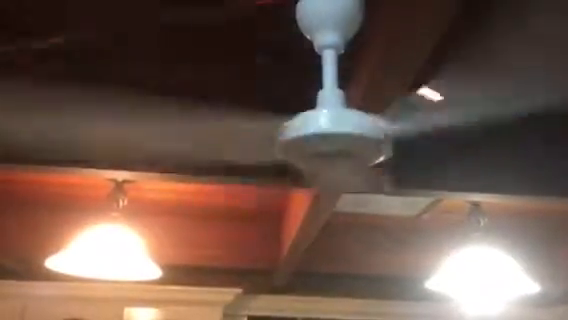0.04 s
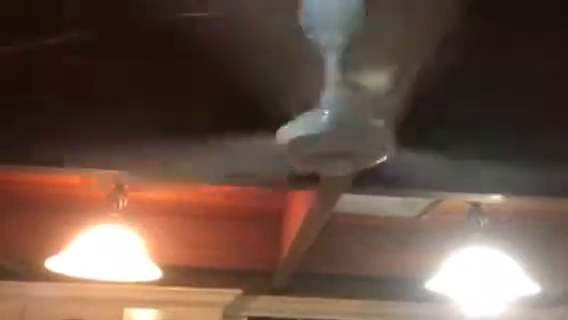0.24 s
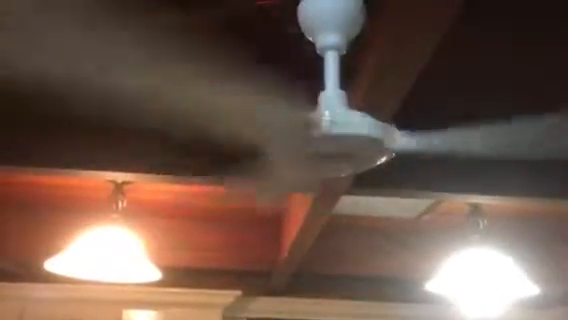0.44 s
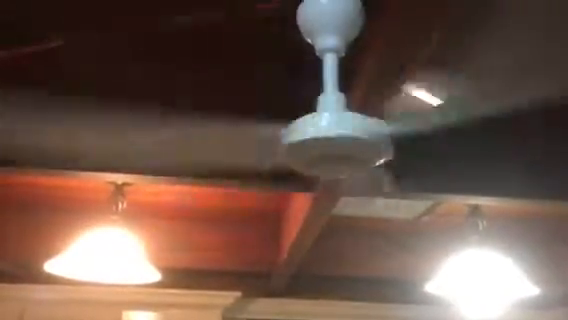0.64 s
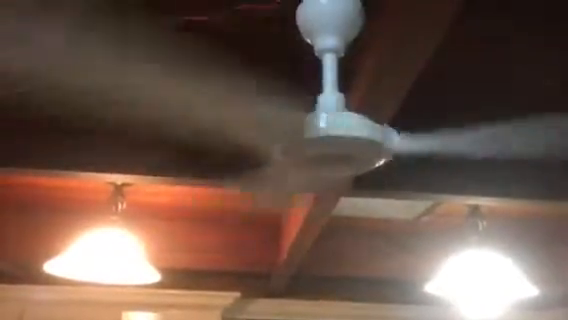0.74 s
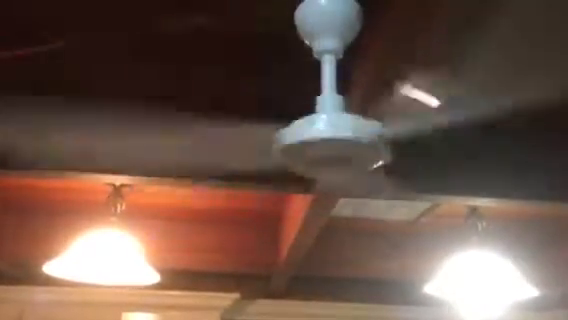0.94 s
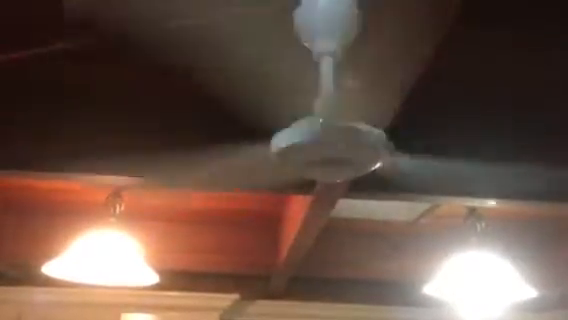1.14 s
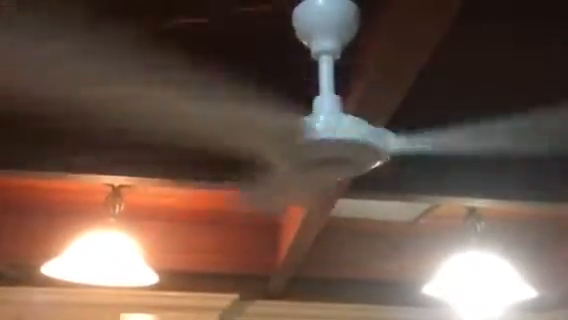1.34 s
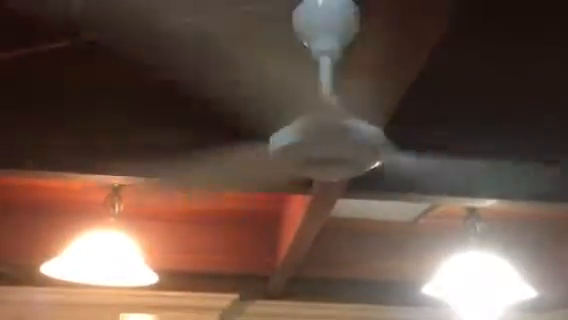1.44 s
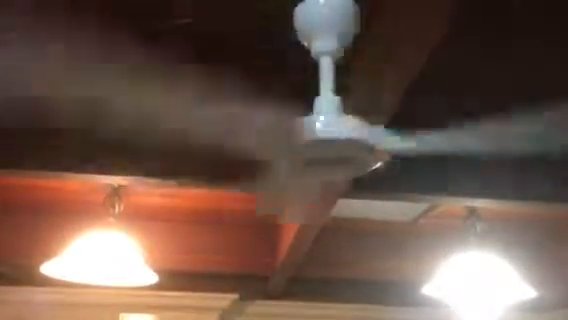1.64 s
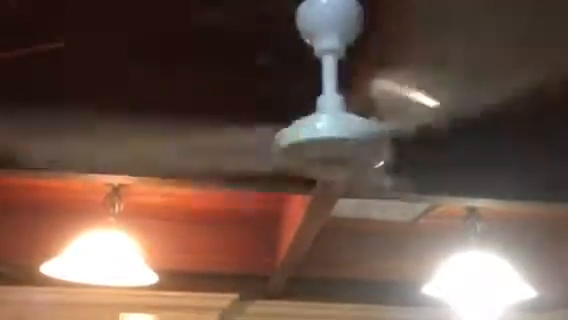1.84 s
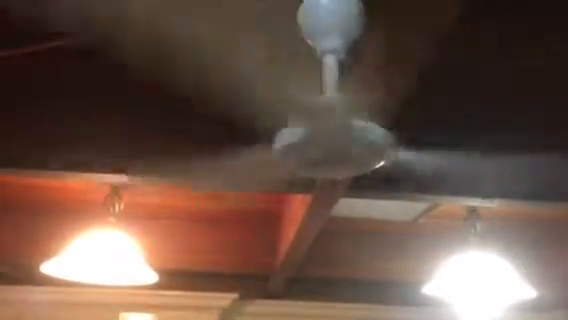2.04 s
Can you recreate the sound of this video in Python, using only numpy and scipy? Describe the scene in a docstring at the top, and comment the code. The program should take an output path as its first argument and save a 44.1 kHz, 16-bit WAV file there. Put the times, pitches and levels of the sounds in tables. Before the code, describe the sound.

A ceiling fan whirrs steadily with a fast, light motor chatter and a low hum.

```python
"""A ceiling fan runs steadily in a quiet room. Its motor chugs nine times a turn, and each chug
shakes a rasp and a thin ring out of the housing. The rotor whirrs and rubs lightly as it goes round.
Under this lie the motor's hum, a low rumble of moving air, soft low thuds and a steady hiss.
A camera close by ticks faintly at its frame rate and is softly bumped once, with a quick double knock."""
import sys
import numpy as np
from scipy import signal
from scipy.fft import rfft, irfft
from scipy.io import wavfile
from scipy.ndimage import uniform_filter1d

SR = 44100
rng = np.random.default_rng(int(sys.argv[2]) if len(sys.argv) > 2 else 0)


def output_pcm(signal):
    """Save a mono or channel-first signal as 16-bit PCM at the path in sys.argv[1].

    Samples are clipped to [-1, 1] before scaling.
    """
    pcm = np.clip(np.atleast_2d(signal).T, -1, 1) * 32767
    wavfile.write(sys.argv[1], SR, np.round(pcm).astype(np.int16))


N = 92610
TURN_HZ, CHUGS_PER_TURN, FIRST_CHUG_S = 4.422, 9, .0126


def amp(db):
    """Turns decibels into a number to multiply a sound by."""
    return 10 ** (np.asarray(db) / 20)


def unit(x):
    """Scales a sound so that its average level (rms) is 1."""
    return x / np.sqrt(np.mean(x ** 2) + 1e-20)


def bell(since, half_s):
    """A smooth rise and fall that peaks when since is 0."""
    return np.exp(-.5 * (since / half_s) ** 2)


def colour(x, points):
    """Shapes the lows and highs of a sound with rows of Hz and dB, at average level 1."""
    hz, db = np.transpose(points)
    gains = amp(np.interp(np.log(np.fft.rfftfreq(N, 1 / SR) + 1), np.log(hz), db))
    return unit(irfft(rfft(x) * gains, N))


def band(hz, width_hz):
    """Noise around one pitch; around 0 Hz it is a slow random wobble."""
    freqs = np.fft.rfftfreq(N, 1 / SR)
    return unit(irfft(rfft(rng.standard_normal(N)) * np.exp(-((freqs - hz) / width_hz) ** 2), N))


def evened(x, span_s):
    """Holds the level of a noise steady from one short span to the next."""
    power = uniform_filter1d(x ** 2, max(round(span_s * SR), 3))
    return unit(x / np.sqrt(abs(power) + 1e-20))


def nearest_chug(t, delay_s):
    """The number of the nearest chug, and the seconds since it (negative before it)."""
    rate = TURN_HZ * CHUGS_PER_TURN
    elapsed = t - FIRST_CHUG_S - delay_s
    number = np.round(elapsed * rate).astype(int)
    return number, elapsed - number / rate


# The tone of the hiss. Each row: frequency in Hz, relative level in dB.
HISS_SPECTRUM = [(100, 8.5), (450, -2.5), (1000, -1), (1600, -5.5), (2300, -1), (2600, -6), (3300, -4),
                 (4800, -13), (5400, -13.5), (6300, -15.5), (7400, -17), (9100, -15), (10500, -23.5),
                 (12000, -27), (13700, -26), (16000, -43)]

def hiss():
    """The steady hiss of the room and the microphone."""
    return amp(-62) * colour(rng.standard_normal(N), HISS_SPECTRUM)


# The tone of the moving air. Each row: frequency in Hz, relative level in dB.
RUMBLE_SPECTRUM = [(10, -28), (28, -2), (45, 4), (68, -2), (95, -5.5), (140, -5.5), (220, -11),
                   (300, -14.5), (420, -22.5), (900, -77)]
# How the rumble rises and falls. Each row: time in seconds, level in dB.
RUMBLE_LEVELS = [(0, -58.5), (.15, -55.5), (.3, -56.5), (.45, -58), (.56, -55), (.85, -55.5), (.98, -57),
                 (1.15, -55.5), (1.45, -55.5), (1.56, -54), (1.63, -59), (1.71, -56.5), (1.8, -59.5),
                 (2.1, -54)]

def air_rumble(t):
    """The draught from the fan makes a low rumble."""
    noise = evened(colour(rng.standard_normal(N), RUMBLE_SPECTRUM), span_s=.06)
    return amp(np.interp(t, *np.transpose(RUMBLE_LEVELS))) * noise


# Soft low thuds. Each row: middle in seconds, peak level in dB, half length in seconds, pitch in Hz.
THUDS = [(.102, -46, .007, 64), (.141, -47.5, .011, 66), (.201, -47, .006, 55), (.577, -48, .02, 82),
         (.666, -45.5, .01, 62), (.717, -43, .007, 68), (.733, -46, .012, 62), (.89, -44.5, .008, 66),
         (1.076, -45, .013, 57), (1.243, -44.5, .009, 66), (1.333, -43.5, .008, 54), (1.397, -48, .014, 72),
         (1.456, -44.5, .015, 66), (1.509, -47, .013, 68), (1.546, -46, .012, 70), (1.583, -43.5, .01, 74),
         (1.695, -43, .008, 80), (1.722, -47, .011, 76), (1.821, -43, .01, 60), (1.91, -46, .009, 70),
         (1.983, -47, .007, 80), (2.084, -46, .009, 78)]

def low_thuds(t):
    """Puffs of air on the microphone, plus the low body of the first light camera knock at 0.2 s."""
    out = np.zeros(N)
    for at, db, half_s, hz in THUDS:
        out -= amp(db) * bell(t - at, half_s) * np.cos(2 * np.pi * hz * (t - at))
    return out


# The tone of a tick. Each row: frequency in Hz, relative level in dB.
TICK_SPECTRUM = [(500, -30), (3000, -9), (4600, -15), (5500, -8), (6400, -10), (7500, -2), (9000, -1),
                 (10300, -12), (11700, -20), (13400, -13.5), (16000, -19)]

def camera_ticks(t, frame_hz=30, ring_hz=9370, ring_decay_s=.0014):
    """The camera ticks twice a frame, the second tick often late, each with a tiny high ring."""
    frames = np.arange(0, N / SR, 1 / frame_hz)
    late_s = .009 * np.maximum(rng.uniform(-1, 1, len(frames)), 0)
    times = np.r_[frames + .0057, frames + .0225 + late_s]
    sizes = amp(.4 * rng.standard_normal(len(times)))
    clicks = np.bincount((times * SR).astype(int), sizes, N)[:N]  # one spike for each tick
    ping = np.exp(-t / ring_decay_s) * np.sin(2 * np.pi * ring_hz * t)
    ringing = unit(signal.fftconvolve(clicks, ping)[:N])
    return amp(-74) * colour(clicks, TICK_SPECTRUM) + amp(-84.5) * ringing


# The two knocks of the bump, light then stronger. Each row: start in seconds, peak level in dB.
KNOCKS = [(0.2018, -38), (.235, -23)]

def camera_knock(t, start, db, high_hz=243, low_hz=53.3, sag_s=.0093, rise_s=.0064, decay_s=.017):
    """A dull, dry knock on the camera body whose pitch sinks as it dies away."""
    age = np.maximum(t - start, 0)
    hz = low_hz + (high_hz - low_hz) * np.exp(-(age / sag_s) ** 2)
    note = np.sin(2 * np.pi * np.cumsum(hz * (age > 0)) / SR)
    rise = np.sin(np.pi / 2 * np.minimum(age / rise_s, 1))
    decay = np.exp(-np.maximum(age - rise_s, 0) / decay_s)
    damping = np.exp(-(age / .034) ** 4)  # cuts the tail short
    return -amp(db) * rise * decay * damping * note


# The motor's steady tones. Each row: pitch in Hz, level in dB.
HUM_TONES = [(78.8, -61), (119.8, -66), (317.6, -74), (519.5, -70.5), (560.7, -75.5), (633, -77),
             (671, -73.5), (710.5, -70.5), (760, -68), (813.4, -69.5)]

def motor_hum(t, throb_hz=206.2, throb_depth=.73, throb_at_s=.1513):
    """The motor hums with wavering tones, plus one that throbs once a turn."""
    def tone(hz):
        return np.sin(2 * np.pi * (hz * t + rng.random()) + .85 * band(0, width_hz=8))

    steady = sum(amp(db) * unit(tone(hz)) for hz, db in HUM_TONES)
    swell = 1 + throb_depth * np.cos(2 * np.pi * TURN_HZ * (t - throb_at_s))
    return steady + amp(-63.5) * unit(swell * tone(throb_hz))


# The tone of the whirr. Each row: frequency in Hz, relative level in dB.
WHIRR_SPECTRUM = [(300, -77), (440, -13.5), (520, -3.5), (600, -5), (700, -0.5), (840, -1.5), (930, -3.5),
                  (1080, -5.5), (1210, -4), (1340, -4), (1520, -16.5), (1750, -17.5), (2200, -25),
                  (2550, -37), (3300, -46), (5000, -35)]

def rotor_whirr(t, repeat_share=.91, drift_s=.0001):
    """The rotor's running noise is mostly the same on every turn, drifting a little with its speed."""
    repeating = np.resize(rng.standard_normal(round(SR / TURN_HZ)), N)
    mixed = np.sqrt(repeat_share) * repeating + np.sqrt(1 - repeat_share) * rng.standard_normal(N)
    noise = evened(colour(mixed, WHIRR_SPECTRUM), span_s=.014)
    drifting_time = t + drift_s * band(0, TURN_HZ)
    return amp(-60) * np.interp(drifting_time, t, noise)


# Spots where the rotor rubs. Each row: first time in seconds, half length in seconds,
# pitch in Hz, width of the noise band in Hz, level at the loudest moment in dB.
RUB_SPOTS = [(0.0195, 0.0015, 1252, 98, -57.5), (0.0456, 0.0016, 1240, 100, -55),
             (0.1284, 0.001, 3800, 600, -61), (0.1424, 0.0016, 3080, 500, -67.5),
             (.208, 0.00087, 3420, 350, -60)]

def rotor_rubs(t):
    """The rotor rubs briefly at the same spots on every turn."""
    out = np.zeros(N)
    for at, half_s, hz, width_hz, db in RUB_SPOTS:
        since = (((t - at) * TURN_HZ + .5) % 1 - .5) / TURN_HZ  # seconds from the nearest pass
        out += amp(db) * bell(since, half_s) * evened(band(hz, width_hz), span_s=.003)
    return out


# How the ring slowly swells and fades. Each row: time in seconds, relative level in dB.
RING_LEVELS = [(.04, 2.5), (.14, -4), (.25, 2.5), (.4, -1.5), (.52, 1), (.6, -2), (.74, 2), (.82, -2),
               (.88, 1), (.95, -3), (1.04, -3), (1.13, 3.5), (1.2, -2), (1.36, 1), (1.56, -3), (1.68, 3),
               (1.8, 1), (1.95, -3), (2.1, -1)]

def metal_ring(t, hz=1950, slip_radians=1.3, sharpness=1.8):
    """A thin metal note is rubbed up afresh after every chug."""
    number, since = nearest_chug(t, delay_s=.0066)
    note = np.sin(2 * np.pi * hz * t + slip_radians * rng.standard_normal(128)[number])
    ring_db = np.array(CHUG_PATTERN)[number % CHUGS_PER_TURN, 3]
    swell_db = np.interp(t, *np.transpose(RING_LEVELS))
    pulse = abs(np.cos(np.pi * since * TURN_HZ * CHUGS_PER_TURN)) ** sharpness
    return amp(-67.3) * unit(amp(ring_db + swell_db) * pulse * note)


# What each chug shakes in the housing. Each row: delay in seconds (negative is early),
# half length in seconds, pitch in Hz, width of the noise band in Hz, average level in dB.
RASPS = [(0.00039, 0.00041, 1120, 52, -79.5), (-0.00022, 0.0019, 2300, 370, -76),
         (-0.00062, 0.0025, 783, 160, -66.5), (-0.00057, 0.0017, 3240, 770, -72.5),
         (-0.00095, 0.004, 3990, 92, -78), (0.0053, 0.0022, 3390, 540, -78),
         (0.0065, 0.0035, 1980, 330, -75.5), (-0.0018, 0.002, 5350, 400, -80.5),
         (.0059, 0.0012, 5200, 1850, -79), (.0058, 0.00079, 9000, 1500, -79.5)]

def housing_rasps(t):
    """Each chug sets off brief rasps, as strong as its place in the turn makes them."""
    out = np.zeros(N)
    for delay_s, half_s, hz, width_hz, db in RASPS:
        number, since = nearest_chug(t, delay_s)
        rasp_db = np.array(CHUG_PATTERN)[number % CHUGS_PER_TURN, 2]
        noise = evened(band(hz, width_hz), span_s=.003)
        out += amp(db) * unit(amp(rasp_db) * bell(since, half_s) * noise)
    return out


# The nine chugs of one turn. Each row: level in dB, pitch in Hz, rasp level in dB, ring level in dB.
# These levels only say how the chugs compare with each other.
CHUG_PATTERN = [(-6.5, 1085, 1, 2), (0, 1085, 2.5, 0), (.7, 1070, 1.5, 1), (-3.2, 1100, 0, 1.5),
                (-3.8, 1105, -2, -2.5), (-3.3, 1100, -2, -3), (-3.2, 1125, -2.5, -2.5),
                (-1.5, 1125, -1.5, 1), (-2.3, 1130, 1, 1)]

def motor_chugs(t, rise_s=.00078, fall_s=.0028, scatter_db=1, jitter_s=.00013):
    """Each chug is a short burst of the housing's main note, in a pattern that repeats every turn."""
    number, since = nearest_chug(t, delay_s=-.00061)
    place = number % CHUGS_PER_TURN
    db, hz = np.array(CHUG_PATTERN)[place, :2].T
    size = amp(db - scatter_db * rng.standard_normal(128)[number])
    jitter = jitter_s * rng.standard_normal(128)[number]
    burst = bell(since, np.where(since < 0, rise_s, fall_s))
    note = np.cos(2 * np.pi * (hz * (since + jitter) + place / CHUGS_PER_TURN))
    return amp(-60) * unit(size * burst * note)


def scene():
    """Adds the fan, the background and the camera noises into one channel."""
    t = np.arange(N) / SR
    fan = motor_chugs(t) + housing_rasps(t) + rotor_rubs(t) + metal_ring(t)
    fan += motor_hum(t) + rotor_whirr(t)
    background = air_rumble(t) + low_thuds(t) + hiss()
    camera = camera_ticks(t) + sum(camera_knock(t, start, db) for start, db in KNOCKS)
    return (fan + background + camera)[None]


def record(dry, low_cut_hz=40, high_cut_hz=15830):
    """Takes away the deepest bass and the highest treble."""
    hz = np.fft.rfftfreq(N, 1 / SR)
    thinned = irfft(rfft(dry) * (1 - np.exp(-(hz / low_cut_hz) ** 4)), N)
    treble_cut = signal.firwin(511, high_cut_hz, window=("kaiser", 9), fs=SR)
    return signal.oaconvolve(thinned, treble_cut[None], "same")


dry = scene()
out = record(dry)
output_pcm(out)
```